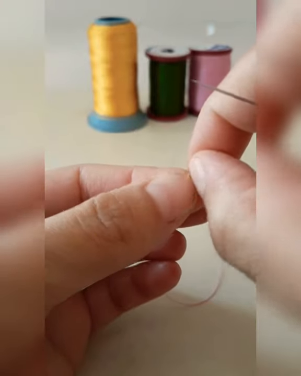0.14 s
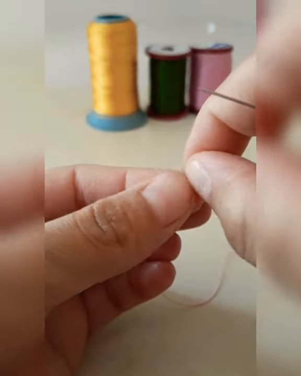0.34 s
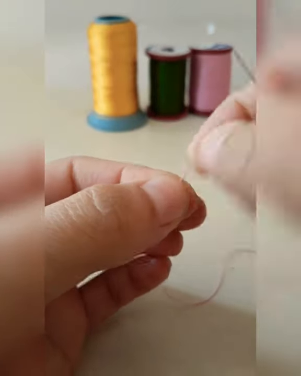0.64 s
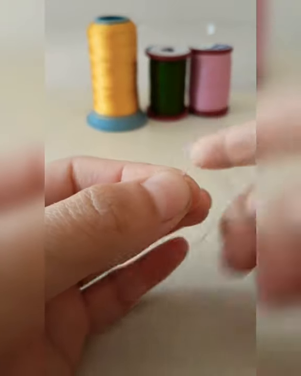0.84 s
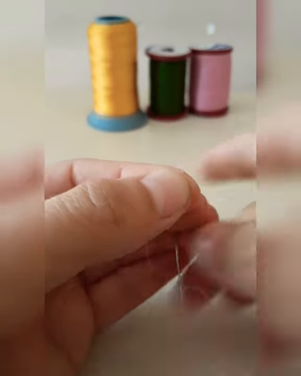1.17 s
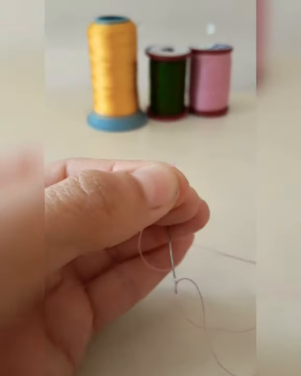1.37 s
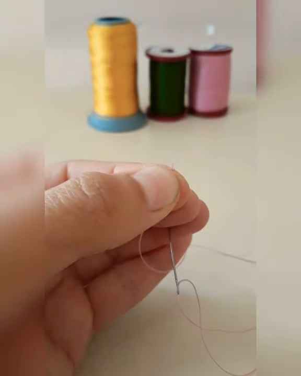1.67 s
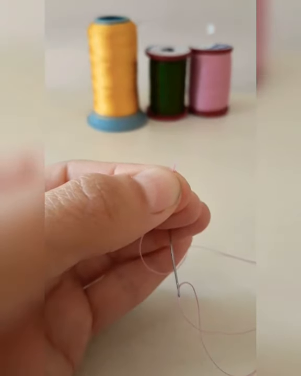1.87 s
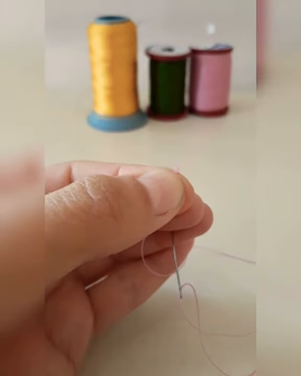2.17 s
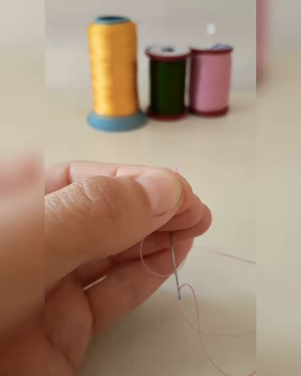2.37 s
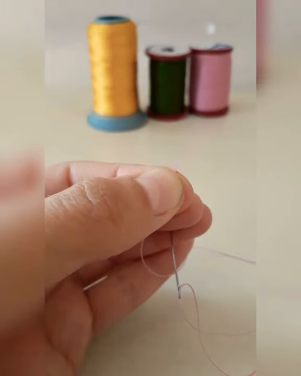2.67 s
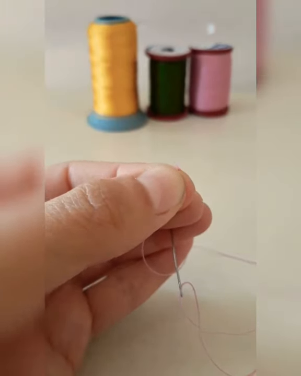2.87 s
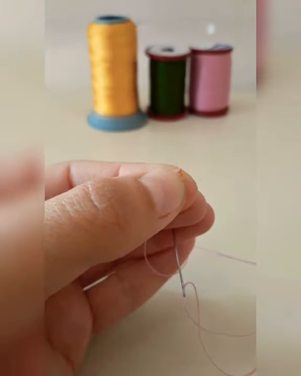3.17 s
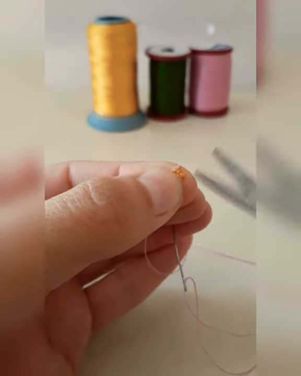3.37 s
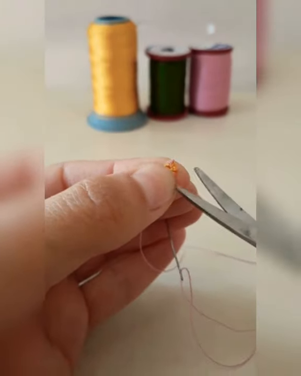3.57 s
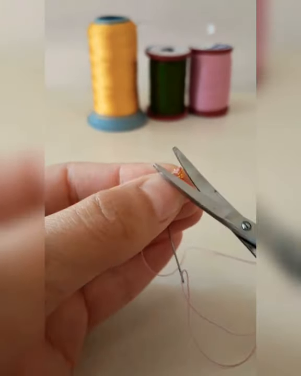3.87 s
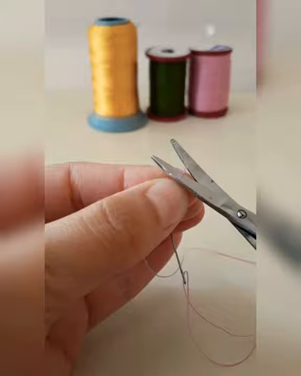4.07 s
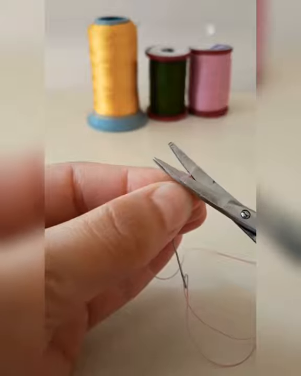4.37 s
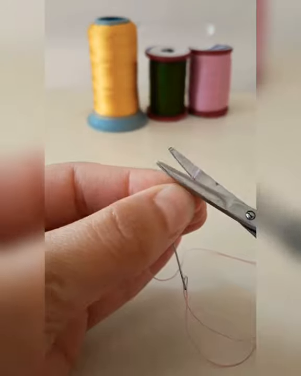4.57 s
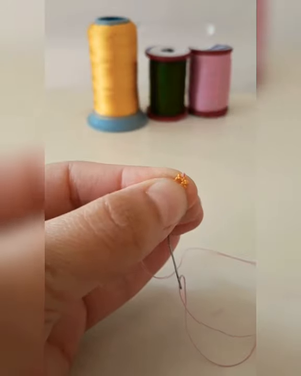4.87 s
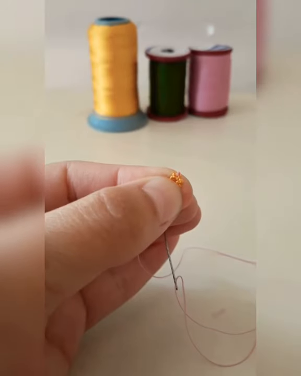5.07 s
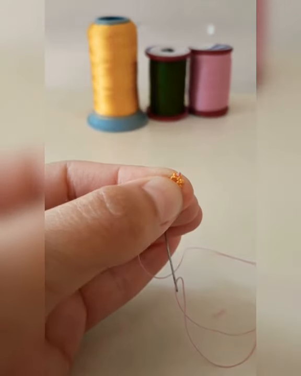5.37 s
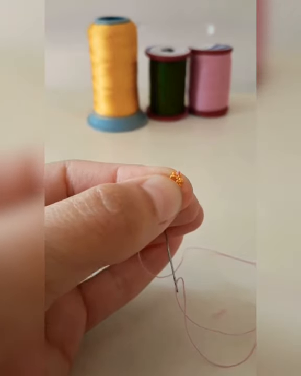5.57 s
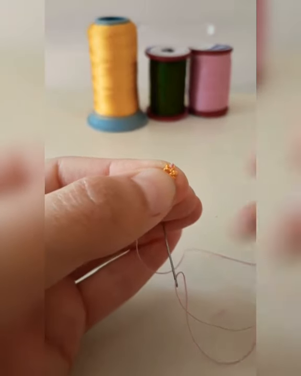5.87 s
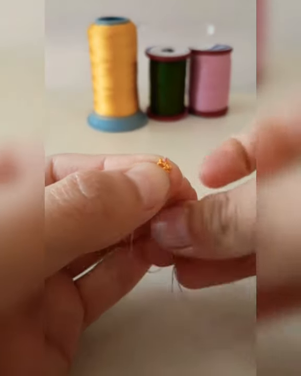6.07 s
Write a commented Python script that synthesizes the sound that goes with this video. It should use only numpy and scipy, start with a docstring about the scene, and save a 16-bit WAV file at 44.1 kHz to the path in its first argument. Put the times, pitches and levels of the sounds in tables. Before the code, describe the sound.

A close, mono microphone at a sewing table picks up very quiet skin rubs, thread hiss and tiny ticks. Scissors clatter hard off the table in a dense fraction of a second, by far the loudest event, with woody knocks and steel rattle. Gentle finger strokes return, then a pause. One dull, quick thread cut with a sharp blade click follows, then a muted set-down and brief slide in a small room.

```python
"""At a table in a quiet room, someone sews by hand close to the microphone. Fingers rub and tick on
the thread, as uneven noise and short bursts. Small steel scissors clatter and scrape as they are
picked up: each knock sets the table's resonances ringing. They snip the thread with a dull run of
slips and sharp clicks of filtered noise, then land softly and slide to a stop."""
import sys
import numpy as np
from scipy import signal
from scipy.fft import rfft, irfft, next_fast_len
from scipy.io import wavfile
from scipy.ndimage import uniform_filter1d, map_coordinates

SR = 44100
rng = np.random.default_rng(int(sys.argv[2]) if len(sys.argv) > 2 else 0)


def transcribe(u):
    """Save the signal u as a 16-bit wav file named by the first command-line argument.

    u: samples, shape (n,) or (channels, n), limited to [-1, 1]; the rate is SR.
    q: integer samples, one column per channel.
    """
    v = np.clip(np.atleast_2d(u).T, -1, 1)
    q = np.round(v * 32767).astype(np.int16)
    wavfile.write(sys.argv[1], SR, q)


N = 274610  # length in samples

# The scissors knock on the table. Each row: start in seconds, level in dB, strongest ring in Hz,
# level of the crack against the clack in dB.
KNOCKS = [(1.599, -32.5, 1300, -5.5), (1.644, -38.5, 1080, -6.5), (1.662, -34, 1110, -8),
          (1.7115, -22, 1475, -1), (1.7245, -24.5, 1680, 0), (1.7334, -13.5, 1467, -1.5),
          (1.8095, -15.5, 1560, 6), (1.8285, -18, 1720, -1.5), (1.8472, -8, 1090, -2),
          (1.8608, -18, 1100, -10.5), (1.883, -20, 1100, -1.5), (1.902, -17, 2140, -10),
          (1.915, -22, 2050, 4), (1.923, -12, 1704, 9), (1.937, -16.5, 710, 4.5)]
# Ringing of the table top with the steel on it. Each row: pitch in Hz, relative level in dB,
# time to fade by 60 dB in seconds.
TABLE_MODES = [(291, -11.5, 0.13), (432, -13.5, .12), (519, -5.5, .14), (686, -2, .13), (813, 1.5, 0.11),
               (996, -3, 0.25), (1269.4, -3, 0.13), (1463, -3.5, 0.0892), (1620, -4, 0.21),
               (1695, -1, 0.092), (1956, -1.5, 0.23), (2314, -7, 0.1179), (3090, -8, 0.17),
               (3777, -7.5, .05), (4772, -7, .05)]
SNIP_S = 4.597  # when the cut starts


def amp(db):
    """Turn decibels into a gain."""
    return 10 ** (np.asarray(db) / 20)


def unit(x):
    """Scale a sound to an average strength (rms) of 1."""
    return x / np.sqrt(np.mean(x ** 2) + 1e-20)


def punch(x):
    """Scale a hit to rms 1 over its loudest 3 ms."""
    return x / np.sqrt(uniform_filter1d(x ** 2, size=132).max())


def along(points, hz):
    """Read a curve of (Hz, value) points, with frequency on a log axis."""
    point_hz, values = np.transpose(points)
    return np.interp(np.log(hz + 1), np.log(point_hz + 1), values)


def fade(t60):
    """Half a second of exponential decay that falls by 60 dB in t60 seconds."""
    return 1000.0 ** (-np.arange(SR // 2) / SR / t60)


def sine(hz):
    """Half a second of one steady vibration."""
    return np.sin(2 * np.pi * hz * np.arange(SR // 2) / SR)


def burst(t60, swell=0.037):
    """The many tiny contacts of one touch: noise that builds up quickly and dies."""
    return rng.standard_normal(SR // 2) * fade(t60) * (1 - fade(swell * t60))


def coloured(x, spectrum):
    """Give a sound the (Hz, dB) spectrum, with a filter that never responds before its input."""
    size = 2 * next_fast_len(len(x) // 2 + SR // 10)
    gain = amp(along(spectrum, np.fft.rfftfreq(size, 1 / SR)))
    # folding the cepstrum (spectrum of the log gain) forward in time gives minimum phase
    cepstrum = irfft(np.log(gain), size)
    cepstrum[1:size // 2] *= 2
    cepstrum[size // 2 + 1:] = 0
    response = np.exp(rfft(cepstrum))
    return irfft(rfft(x, size) * response, size)[:len(x)]


def resonate(x, hz, q):
    """One resonance; a higher q is narrower and rings longer."""
    b, a = signal.iirpeak(hz, q, SR)
    return signal.lfilter(b, a, x)


def band(x, hz, octaves):
    """A broad resonance with steep skirts."""
    edges = hz * 2 ** (np.array([-.5, .5]) * octaves)
    return signal.sosfilt(signal.butter(2, edges, "band", fs=SR, output="sos"), x)


def friction(spectrum, rate, spread_db):
    """Rubbing of rms 1: the surface catches and slips at random, rate times a second."""
    positions = np.arange(N) * rate / SR
    grip = map_coordinates(rng.standard_normal(SR), [positions], order=1, mode="wrap")
    rubbing = rng.standard_normal(N) * amp(spread_db * grip)
    return unit(coloured(rubbing, spectrum))


def movement(s, length):
    """Gain of one hand movement: it builds to 1 at time s and dies away, above a third for about its length."""
    rise_share = 0.39  # it builds faster than it dies
    peakedness = 1.7  # 1 = pointed top, 2 = round
    t = np.arange(N) / SR - s
    side_s = length * np.where(t < 0, rise_share, 1 - rise_share)
    return np.exp(-np.abs(t / side_s) ** peakedness)


def add(track, s, sound):
    """Mix a sound in at time s, cut off at the end of the track."""
    part = track[round(s * SR):][:len(sound)]
    part += sound[:len(part)]


def room(x, wet_db):
    """The direct sound and a short diffuse tail, in which the highest treble dies first."""
    # Each row: frequency in Hz, time for the tail to fade by 60 dB in seconds.
    tail_fades = [(100, 0.23), (400, 0.29), (700, 0.19), (1100, 0.22), (2000, 0.27), (3000, .35),
                  (5000, 0.22), (12000, 0.093)]
    hz, t, z = signal.stft(rng.standard_normal(SR // 2), SR, nperseg=256)
    decay = amp(-60 * t / along(tail_fades, hz)[:, None])
    tail = signal.istft(z * decay, SR, nperseg=256)[1]
    tail = np.pad(tail / np.linalg.norm(tail), (SR // 200, 0))  # the tail starts 5 ms late
    return x + amp(wet_db) * signal.fftconvolve(x, tail)[:N]


def background():
    """Steady room noise and hiss, with the low rustle of moving arms in the room's resonances."""
    # Spectrum of the still room. Each row: frequency in Hz, relative level in dB.
    quiet = [(25, -27.5), (70, -4.5), (130, -3.5), (230, -4.5), (480, -8.5), (680, -18.5), (1000, -16),
             (1300, -22), (1800, -20), (2600, -25), (4600, -22), (6800, -28), (8500, -28.5), (10200, -35.5),
             (13000, -23.5), (15500, -23)]
    # Spectrum of the rustling sleeves. Each row: frequency in Hz, relative level in dB.
    sleeves = [(30, -27.5), (80, 4.5), (130, -1.5), (300, 5), (450, -3.5), (620, -12.5), (800, -16),
               (980, -9), (1250, -23), (2000, -28.5), (5000, -44)]
    # The arms move. Each row: peak in seconds, length in seconds, level in dB.
    moves = [(0.34, 0.3, -59), (0.727, 0.9, -66.5), (1.25, 0.26, -62.5), (1.67, 0.15, -44),
             (2.77, 0.95, -65), (3.493, 0.52, -64), (4.745, 0.43, -62.5), (5.604, 0.37, -58.5),
             (6.018, .2, -62.5)]
    still = amp(-65.5) * unit(coloured(rng.standard_normal(N), quiet))
    rustle = unit(room(friction(sleeves, rate=12, spread_db=1.2), wet_db=3.0))
    moving = sum(amp(db) * movement(s, length) for s, length, db in moves)
    return still + rustle * moving


def fingers(hollow_db=-9):
    """Skin rubs, coloured by the hollow of the hand; thread hisses through it, and nails tick on the needle."""
    # Spectrum of rubbing skin. Each row: frequency in Hz, relative level in dB.
    skin_colour = [(400, -16), (750, -4.5), (1000, 1.5), (1250, -6.5), (1650, 4.5), (1950, -6.5),
                   (2400, -12.5), (3400, -7), (4450, -7.5), (5600, -45), (9000, -37)]
    # Spectrum of hissing thread. Each row: frequency in Hz, relative level in dB.
    thread_colour = [(3000, -17.5), (5000, 5), (6500, -4.5), (8400, 4), (10200, -15.5), (13000, -4.5),
                     (16000, -7.5)]
    # The fingers stroke along the thread. Each row: peak in seconds, length in seconds,
    # skin level in dB, thread hiss level in dB, strongest resonance in Hz.
    strokes = [(.24, 0.21, -72.5, -104.5, 970), (0.586, 0.14, -61.5, -90, 1460),
               (0.772, 0.16, -74.5, -69, 1100), (.955, 0.18, -59, -68.5, 1710),
               (1.18, 0.1, -69.5, -74, 1540), (1.337, 0.12, -72, -77, 3550),
               (2.349, 0.057, -56.5, -64.5, 1700), (2.45, 0.061, -60.5, -63, 1800),
               (2.593, 0.19, -62, -71, 1730), (2.73, 0.11, -66, -64.5, 1797),
               (2.83, 0.11, -67, -72.5, 1726)]
    # Fingernails, needle and thread tick. Each row: start in seconds, level in dB,
    # middle pitch in Hz, time for the burst to fade by 60 dB in seconds.
    ticks = [(.928, -49.5, 4070, 0.015), (0.938, -47, 3600, 0.019), (1.0872, -46, 3200, 0.0091),
             (1.1266, -49, 1720, 0.0089), (1.145, -54, 8560, 0.01), (1.407, -56.5, 8300, 0.009),
             (2.599, -49.5, 1435, 0.019), (3.075, -59, 1190, 0.05), (3.197, -56, 3600, 0.083),
             (3.735, -61, 1013, .007), (5.783, -54, 1810, 0.029), (5.921, -60, 4500, 0.022)]
    skin = friction(skin_colour, rate=250, spread_db=2.5)
    thread = friction(thread_colour, rate=400, spread_db=3.5)
    out = np.zeros(N)
    for s, length, skin_db, hiss_db, hz in strokes:
        hollow = unit(resonate(skin, hz, q=4.4))
        rub = unit(skin + amp(hollow_db) * hollow)
        out += movement(s, length) * (amp(skin_db) * rub + amp(hiss_db) * thread)
    for s, db, hz, t60 in ticks:
        tick = punch(band(burst(t60), hz, octaves=0.35))
        add(out, s, amp(db) * tick)
    return room(out, wet_db=-10.0)


def bumps():
    """Soft flesh on the table, like one soft landing of the scissors, excites only its low resonances; so does
    the weight behind each knock."""
    # Soft thumps on the table: the hand bumps it, and the 5.4587 s row is the scissors landing. Each row: start
    # in seconds, level in dB, middle pitch in Hz, # time for the burst to fade by 60 dB in seconds.
    soft_thumps = [(0.754, -50.5, 80, 0.027), (1.643, -37.5, 403, 0.14), (1.926, -42.5, 135, 0.049),
                   (2.599, -47, 349, 0.05), (3.076, -54.5, 407, 0.076), (5.358, -42.5, 407, 0.13),
                   (5.4587, -38, 506, 0.056), (5.509, -47, 329, 0.13), (5.516, -43, 122.2, 0.067)]
    thud_db, thud_grows = -39.5, 0.33  # level under a 0 dB knock, and dB gained per dB of knock
    thud_hz, thud_t60 = 233, .07
    boom_db = -25.5  # the table's lowest modes, relative to the knock
    out = np.zeros(N)
    for s, db, hz, t60 in soft_thumps:
        bump = punch(band(burst(t60, swell=0.027), hz, octaves=1.4))
        add(out, s, amp(db) * bump)
    lowest = TABLE_MODES[:3]
    boom = punch(sum(amp(mode_db) * sine(hz) * fade(t60) for hz, mode_db, t60 in lowest))
    for s, db, _, _ in KNOCKS:
        thud = punch(band(burst(thud_t60, swell=0.027), thud_hz, octaves=1.8))
        direction = np.sign(rng.standard_normal())  # the boom starts up or down at random
        add(out, s, amp(thud_db + thud_grows * db) * thud + amp(boom_db + db) * direction * boom)
    return room(out, wet_db=-7.0)


def lay_down():
    """A few damped touches and a short slide that slows to a stop on the table."""
    # The scissors land softly, still held. Each row: start in seconds, level in dB,
    # time for the burst to fade by 60 dB in seconds.
    landings = [(5.3567, -32, 0.011), (5.3671, -29, 0.0085), (5.3909, -35.5, 0.02), (5.434, -40, 0.021)]
    # Spectrum of the touches and the slide. Each row: frequency in Hz, relative level in dB.
    sliding = [(60, -28), (105, 5.5), (190, -11), (460, 1), (620, -23), (950, -0.5), (1450, -7.5),
               (2250, 2), (2900, -8.5), (4200, -8.5), (5400, -10), (6800, -23.5), (10000, -27.5),
               (15000, -25.5)]
    land_s, attack_s, slide_length_s = 5.357, 0.0028, 0.171
    slide_db, slowing_db_per_s, stop_db_per_s = -44, 78, 260  # it fades as it slows, then stops
    t = np.maximum(np.arange(N) / SR - land_s, 0)
    after_slide = np.maximum(t - slide_length_s, 0)
    level_db = slide_db - slowing_db_per_s * t - stop_db_per_s * after_slide
    attack = np.minimum(t / attack_s, 1)
    out = attack * amp(level_db) * friction(sliding, rate=320, spread_db=2.5)
    for s, db, t60 in landings:
        touch = punch(coloured(burst(t60), sliding))
        add(out, s, amp(db) * touch)
    return room(out, wet_db=-11)


def blade_clicks():
    """The blades glide, meet at the end of the cut, and rattle when lifted and laid down."""
    # Steel clicks against steel. Each row: start in seconds, level in dB,
    # time for the burst to fade by 60 dB in seconds.
    clicks = [(1.8098, -32, .012), (1.9225, -37, 0.15), (2.0133, -45.5, .05), (2.025, -49.5, 0.092),
              (4.597, -51.5, 0.0613), (4.6021, -48.5, 0.008), (4.6801, -37.5, 0.0119), (4.692, -55, 0.011),
              (5.3575, -50.5, 0.023), (5.3683, -36, 0.0082), (5.378, -50, 0.0059), (5.434, -39.5, 0.0178),
              (5.4443, -50, .01)]
    # Spectrum of the blades. Each row: frequency in Hz, relative level in dB.
    blades = [(300, -7), (2500, -16.5), (3800, -7), (4800, 2), (6300, -15.5), (8000, -3), (10000, -21),
              (12500, -10.5), (16000, -12.5)]
    closing_s, edge_db = 0.061, -59.5  # edge glides on edge while the blades close
    closing = movement(SNIP_S + closing_s / 2, closing_s)
    out = amp(edge_db) * closing * friction(blades, rate=430, spread_db=2.5)
    for s, db, t60 in clicks:
        click = punch(coloured(burst(t60), blades))
        add(out, s, amp(db) * click)
    return room(out, wet_db=-13)


def snip(scatter_db=1.5, detune=0.1, stagger=.15):
    """The thread yields in a quick run of dull slips between the closing blades, then its strands part."""
    # The strands of the thread part. Each row: start in seconds, level in dB, pitch in Hz.
    strands = [(4.6283, -36, 1103), (4.6445, -54, 1290)]
    shear_length_s, slips_per_s = .021, 270  # the blades shear fibre after fibre
    typical_db, typical_hz = -48, 1250  # each slip strays a little from these
    slips = []
    for t in np.arange(0, shear_length_s, 1 / slips_per_s):
        delay, loudness, pitch = rng.standard_normal(3)
        start = SNIP_S + t + stagger * delay / slips_per_s
        slips.append((start, typical_db + scatter_db * loudness, typical_hz * np.exp(detune * pitch)))
    out = np.zeros(N)
    for s, db, hz in slips + list(strands):
        slip = resonate(sine(hz) * fade(0.015), hz, q=4.2)
        add(out, s, amp(db) * punch(slip))
    return room(out, wet_db=-15)


def contacts():
    """Every knock, and the rebounds of the hard ones, which strike again a moment later and duller."""
    hard_db = -14.8  # knocks above this level rebound
    delay_s, change_db, ring_hz, crack_db = .0047, -3.5, 1080, -7
    rebounds = [(s + delay_s, db + change_db, ring_hz, crack_db)
                for s, db, _, _ in KNOCKS if db > hard_db]
    return list(KNOCKS) + rebounds


def table_ring(centre_hz, reach_octaves=1.0, scatter_db=6.0, detune=0.0045):
    """The table's modes ring after one knock, most strongly those near centre_hz."""
    ring = 0
    for hz, mode_db, t60 in TABLE_MODES:
        share = 1 / (1 + (np.log2(hz / centre_hz) / reach_octaves) ** 2)
        direction = np.sign(rng.standard_normal())
        size = direction * share * amp(mode_db + scatter_db * rng.standard_normal())
        # the shifting grip loads the modes a little differently each time
        mode_hz = hz * (1 + detune * rng.standard_normal())
        ring = ring + size * sine(mode_hz) * fade(t60)
    return ring


def pick_up(ring_db=-5, clack_t60=0.01625, chatter_t60=0.039):
    """The scissors rock and drag on the table: each knock is a short clack that sets the nearby modes ringing."""
    # Spectrum of hard contact with the table. Each row: frequency in Hz, relative level in dB.
    hard_contact = [(60, -46), (120, -32.5), (300, -22), (490, -9.5), (590, -21), (700, -10.5),
                    (1100, -4.5), (1900, 5), (2550, -6), (4600, -7.5), (6700, -30.5), (7800, -30),
                    (10000, -46), (13500, -42)]
    # The scissors drag over the table. Each row: peak in seconds, length in seconds, level in dB.
    drags = [(1.709, 0.037, -40.5), (1.742, 0.043, -26.5), (1.837, .045, -25.5), (1.915, .05, -22)]
    out = np.zeros(N)
    for s, db, centre_hz, crack_db in contacts():
        ring = table_ring(centre_hz)
        clack = resonate(sine(centre_hz) * fade(clack_t60), centre_hz, q=2.5)
        crack = coloured(burst(chatter_t60), hard_contact)
        knock = punch(clack) + amp(ring_db) * punch(ring) + amp(crack_db) * punch(crack)
        add(out, s, amp(db) * punch(knock))
    # the dragging steel sings at the table's broad middle resonance
    scrape = friction(hard_contact, rate=300, spread_db=5.5)
    singing = unit(scrape + amp(-4.0) * resonate(scrape, hz=1810, q=1))
    pressure = sum(amp(db) * movement(s, length) for s, length, db in drags)
    return room(out + pressure * singing, wet_db=-10.5)


def scene():
    """All sources at one microphone."""
    hands = fingers() + bumps()
    scissors = lay_down() + blade_clicks() + snip() + pick_up()
    return (background() + hands + scissors)[None]


def record(dry, low_cut_hz=46, top_hz=16100):
    """The small microphone sheds deep bass and keeps nothing above its band limit."""
    size = next_fast_len(N + SR // 2)
    thin = signal.sosfilt(signal.butter(3, low_cut_hz, "high", fs=SR, output="sos"), dry)
    kept = np.fft.rfftfreq(size, 1 / SR) < top_hz
    return irfft(rfft(thin, size) * kept, size)[..., :N]


dry = scene()
out = record(dry)
transcribe(out)
```